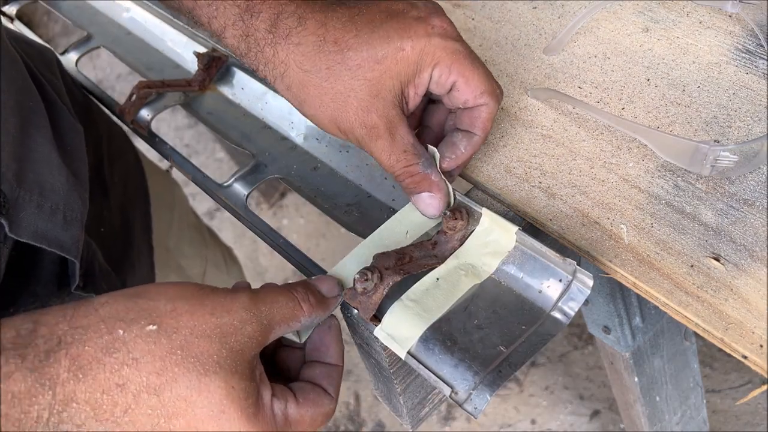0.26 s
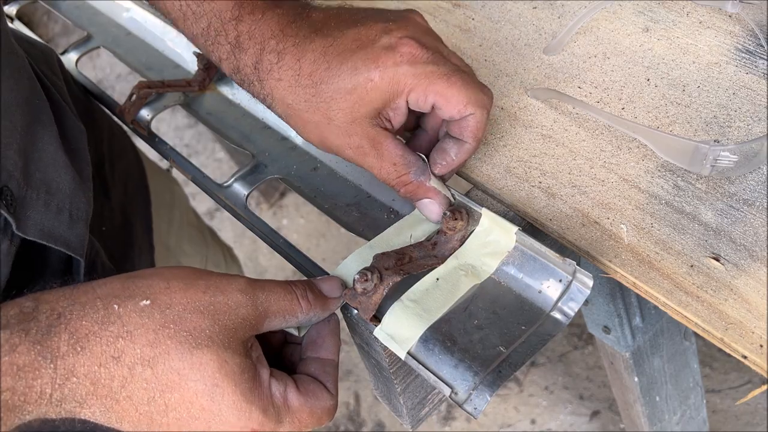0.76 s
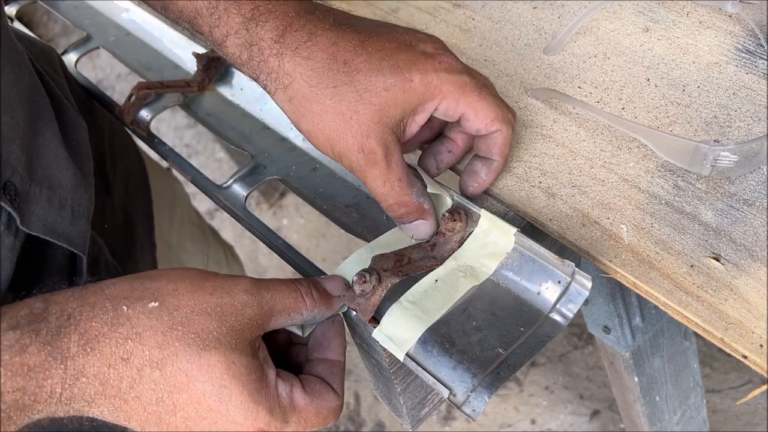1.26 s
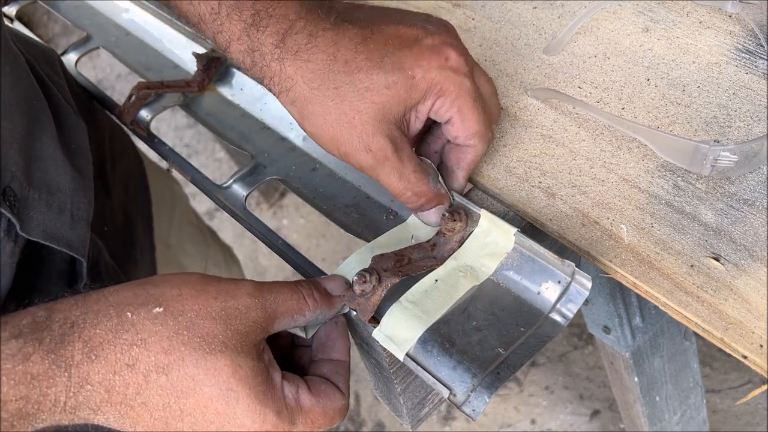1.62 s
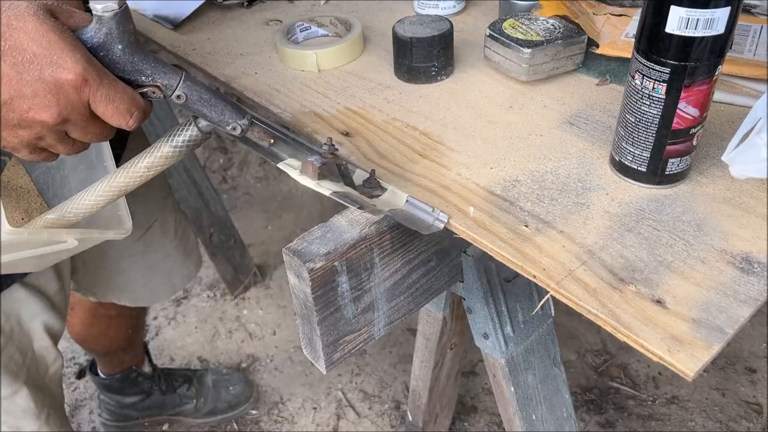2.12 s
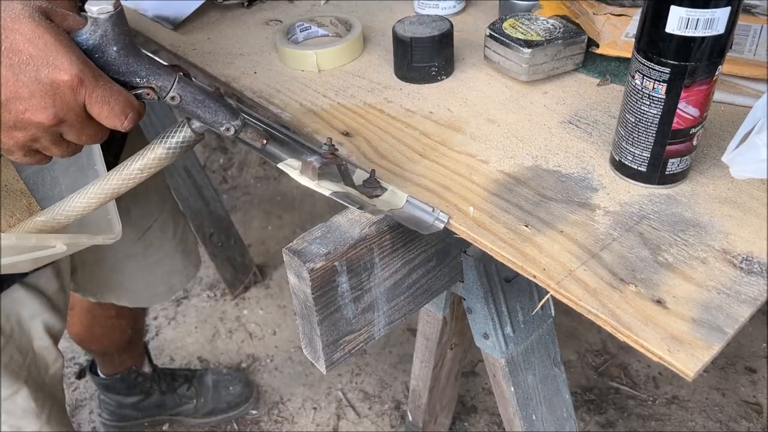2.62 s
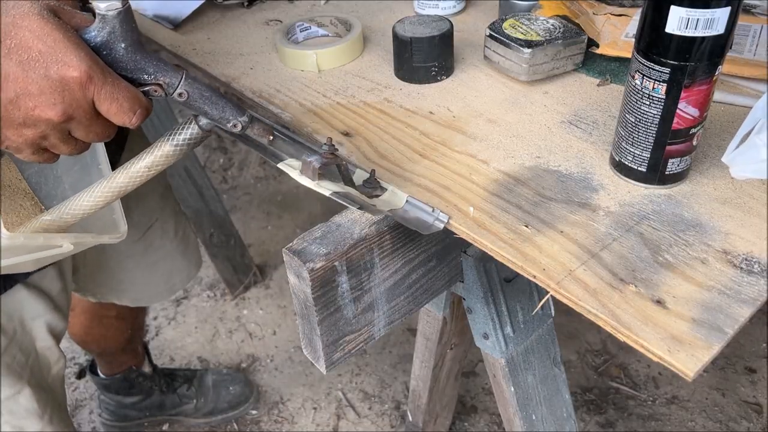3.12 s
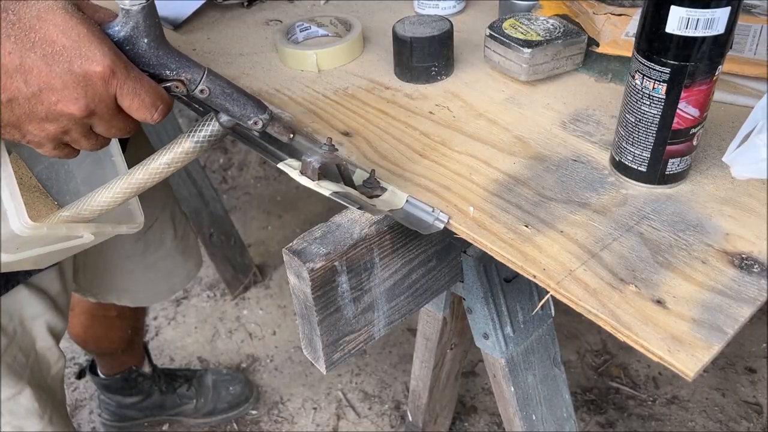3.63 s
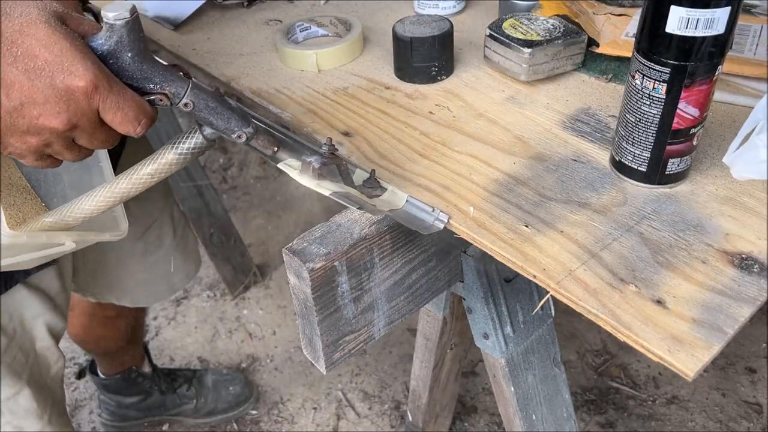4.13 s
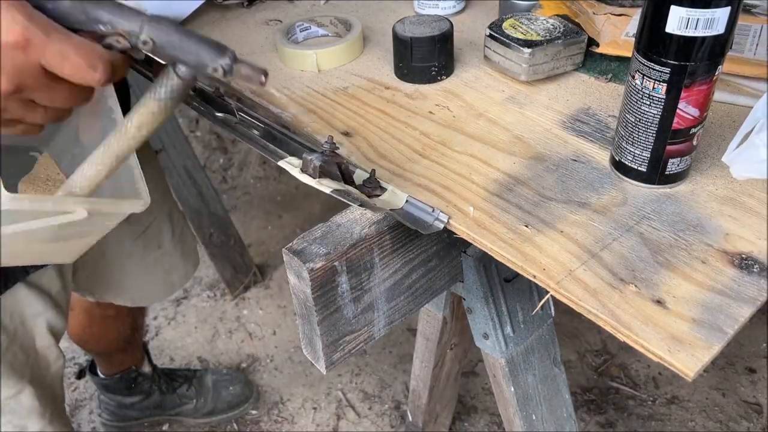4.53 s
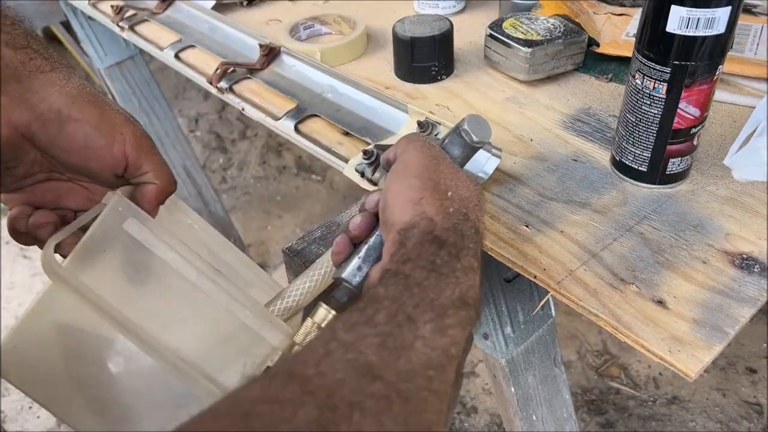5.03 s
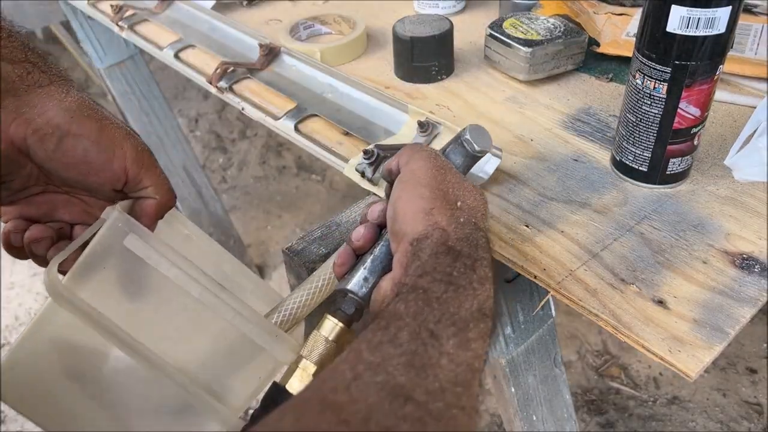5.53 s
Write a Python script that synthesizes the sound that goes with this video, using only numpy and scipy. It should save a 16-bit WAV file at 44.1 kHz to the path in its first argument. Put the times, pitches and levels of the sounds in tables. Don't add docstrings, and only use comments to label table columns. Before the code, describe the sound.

In an open workshop, small sticky tape snaps click over a low steady compressor drone and faint wind rumble. A tiny air puff leads abruptly into a long, loud, bright roar of grit on steel, gradually losing pressure. It shuts off sharply with a short echo, leaving thin hiss and wind; after a scene cut, a closer blast spits, swells and starves. Stereo recorder near the bench.

```python
import sys
import numpy as np
from scipy import signal
from scipy.fft import rfft, irfft, next_fast_len
from scipy.io import wavfile
from scipy.ndimage import uniform_filter1d

SR = 44100
rng = np.random.default_rng(int(sys.argv[2]) if len(sys.argv) > 2 else 0)


def attenuation_scalar(level_db):
    decades = np.asarray(level_db, float) / 20
    return 10 ** decades


def put_to_file(sound):
    columns = np.atleast_2d(sound).T
    safe = np.clip(columns, -1, 1)
    whole_steps = np.round(safe * 32767)
    wavfile.write(sys.argv[1], SR, whole_steps.astype(np.int16))


N = 254016
PAD = next_fast_len(N + 8192)
T = np.arange(N) / SR
HZ = np.maximum(np.arange(PAD // 2 + 1) * SR / PAD, 1)

PUFF_S, LONG_ON_S, LONG_OFF_S = 1.85, 1.9168, 4.556
JOIN_S = 4.954
CLOSE_ON_S, FULL_FLOW_S = 5.135, 5.178
CROSS_HZ, TOP_LAG_S = 7670, 0.0001494
PIVOT_HZ = 4500

# pitch_hz, left_over_right_db, likeness (0-1), right_lead_rad
LONG_PAIR = [(60, -0.5, 0.78, -0.1), (200, 0.2, 0.84, 0.01), (400, 0.1, 0.73, 0.3), (800, 3.1, 0.65, -0.01),
             (1400, 2.0, 0.68, -0.56), (2100, 3.9, 0.51, -0.96), (2800, 2.3, 0.61, -1.79),
             (3500, 6.0, 0.53, -2.17), (4200, 7.5, 0.44, -2.16), (4900, 10.9, 0.15, 1.18),
             (5600, 8.3, 0.3, 1.93), (6300, 8.8, 0.12, 0.98), (7000, 3.7, 0.48, 0.42)]
CLOSE_PAIR = [(60, -0.4, 0.93, -0.09), (200, 1.3, 0.86, -0.17), (400, 2.5, 0.82, -0.12),
              (800, -3.9, 0.73, 0.08), (1400, 1.5, 0.87, 0.08), (2100, 0.6, 0.79, -0.18),
              (2800, 2.3, 0.81, -1.03), (3500, 1.0, 0.81, -0.97), (4200, 0.3, 0.52, -0.97),
              (4900, 5.8, 0.61, -1.09), (5600, 4.5, 0.42, 0.66), (6300, 1.7, 0.28, 0.13),
              (7000, 1.7, 0.58, 0.25)]
AIR_PAIR = [(60, 1.3, .92, .2), (200, 1.7, .95, .6), (330, 2, .92, 1.05), (500, 0, .4, 1.4),
            (800, 1, .3, 2.6), (1400, 0, .45, 2.5), (2100, 1.3, .1, 2.5), (3500, 2.7, .16, 4.4),
            (4900, 9, .15, 5.7), (5600, 9.4, .15, 6.3), (7000, 2.5, .3, 6.4)]


def at_hz(points, hz):
    where, *columns = np.transpose(points)
    return [np.interp(np.log(hz), np.log(where), c) for c in columns]


def in_time(rows, t):
    s, *columns = np.transpose(rows)
    return [np.interp(t, s, c) for c in columns]


def smooth_chance(shape, size):
    field = rng.standard_normal(shape)
    for axis, cells in enumerate(size):
        for twice in range(2):
            field = uniform_filter1d(field, max(int(cells), 1), axis=axis)
    return field / field.std()


def drift(cells):
    count = N // 32 + 2
    return np.interp(np.arange(N) / 32, np.arange(count), smooth_chance((count,), (cells,)))


def bump(t, s, length):
    return np.exp(-((t - s) / length) ** 2)


def settle(t, tau):
    return 1 - np.exp(-np.maximum(t, 0) / tau)


def noise():
    return rng.standard_normal((2, N))


def reshape(x, gain_db):
    hz, t, z = signal.stft(x, SR, nperseg=1024, noverlap=768)
    z = z * attenuation_scalar(gain_db(np.maximum(hz, 1)[:, None], t))
    return signal.istft(z, SR, nperseg=1024, noverlap=768)[1][..., :N]


def ports(two, colour, pair, extra=1, band=(3000, 7000), top_alike=.95):
    balance_db, alike, lead = at_hz(pair, HZ)
    top = np.clip((HZ - CROSS_HZ) / 1200 + .5, 0, 1)
    late_left = np.exp(2j * np.pi * HZ * TOP_LAG_S)
    shared = (1 - top) * alike * np.exp(1j * lead) + top * top_alike * late_left
    own = np.sqrt(np.clip(1 - (1 - top) * alike ** 2 - top * top_alike ** 2, 0, 1))
    left = attenuation_scalar(at_hz(colour, HZ)[0]) * extra
    right = attenuation_scalar(-balance_db * (1 - top))
    mid_power = np.abs(left) ** 2 * (np.abs(1 + right * shared) ** 2 + (right * own) ** 2) / 4
    inside = (HZ > band[0]) & (HZ < band[1])
    left = left / np.sqrt(mid_power[inside].sum() / len(HZ))
    a, b = rfft(two, PAD)
    return irfft([left * a, left * right * (shared * a + own * b)], PAD)[:, :N]


def ducking():
    duck_db, duck_s, third_scene_db = -14, 0.21, 2
    second = duck_db * settle(T - LONG_ON_S, duck_s)
    third = third_scene_db + duck_db * settle(T - FULL_FLOW_S, duck_s)
    return np.where(T < JOIN_S, second, third)


def wind():
    # peak_s, level_db, length_s
    gusts_and_lulls = [(1.11, -9, .05), (1.28, 3, .06), (2.01, 16, 0.1), (2.34, 15, .05), (2.58, 8, .05),
                       (3.344, -17, .04), (3.548, 3, .08), (4.2, -11, .05), (4.553, 17, 0.057),
                       (5.25, 7, .08), (5.41, -8, .05), (5.623, 5.5, 0.13)]
    gusts = sum(db * bump(T, s, length) for s, db, length in gusts_and_lulls)
    level_db = -56.5 + 7 * (T > JOIN_S) + 0.57 * ducking()
    lumps = attenuation_scalar(level_db + gusts + 2.0 * drift(80.))
    colour = [(20, -22), (40, 2.5), (65, 8.5), (110, 2.5), (180, 0), (300, -33)]
    pair = [(60, .5, .9, 0), (300, .5, .9, 0)]
    return ports(noise() * lumps, colour, pair, band=(30, 130))


def shop_air():
    # pitch_hz, level_db
    air_colour = [(60, 2), (130, 9), (270, 12), (330, 11), (430, 4), (560, 7), (830, 13), (1050, 7),
                  (1500, 6), (2500, 0), (4000, -1), (5800, -1), (7000, -10), (10800, -19), (11500, -24),
                  (15500, -31)]
    # pitch_hz, gain_db
    moved_air = [(150, 2), (250, -0.5), (450, 7), (750, -2.5), (1600, 0), (4000, 0), (9000, 0), (13000, 5)]
    lingering = 7.5 * (1 - settle(T - LONG_OFF_S, 0.15)) * (T > LONG_OFF_S) * (T < JOIN_S)
    level_db = -53 + ducking() + lingering

    def breathing(hz, t):
        patches = .6 * smooth_chance((len(hz), len(t)), (12., 20.))
        return patches + at_hz(moved_air, hz)[0] * (t > LONG_ON_S)
    return ports(reshape(noise(), breathing) * attenuation_scalar(level_db - 3.5), air_colour, AIR_PAIR, top_alike=0.91)


def order(k, level_db, lead, waver_db):
    drone_hz = 75.38
    phase = 2 * np.pi * k * drone_hz * T + .12 * np.sqrt(k) * drift(120.) + 7 * rng.random()
    strength = np.sqrt(2) * attenuation_scalar(level_db + waver_db * drift(100.))
    return strength * np.array([np.sin(phase), attenuation_scalar(-2) * np.sin(phase + lead)])


def compressor():
    # order, rms_db, right_lead_rad
    steady = [(1, -59, .2), (4, -45, 1.0), (5, -63, 1.2), (8, -56, .8), (9, -66, 2.5), (10, -59, 1.0),
              (11, -59, 2.9), (12, -62, 1.0), (14, -68, 1.0), (16, -64, 1.0)]
    # order, rms_db, right_lead_rad, beat_period_s, crest_s, depth (0-1)
    beating = [(2, -57, .5, .425, .07, 0.5), (3, -52.5, 0.53, 2.42, .92, 0.7)]
    moved = T > LONG_ON_S
    duck_db = ducking()
    drone = np.zeros((2, N))
    for k, db, lead in steady:
        level_db = db + 0.95 + duck_db - 5.5 * (k > 4) * moved
        drone += order(k, level_db, lead, 1.2 if k == 4 else 2.5)
    for k, db, lead, period, crest, depth in beating:
        beat = 1 + depth * np.cos(2 * np.pi * (T - crest) / period)
        level_db = db + duck_db + 5 * (round(k) == 2) * moved
        drone += beat * order(round(k), level_db, lead, 0.86)
    return drone


def tape():
    # start_s, level_db, length_s, brightness (0-1)
    presses = [(.131, -47, .002, .7), (0.188, -31.5, 0.004, 0.74), (.435, -56, .008, .9),
               (.452, -50, .01, .6), (.493, -45, .002, .8), (.537, -52, .002, .8), (0.622, -45, 0.012, 0.1),
               (.838, -48, 0.0061, 0.2), (.907, -49, .004, .5), (0.953, -50, 0.025, .6),
               (1.056, -35, .007, 0.4), (1.07, -38, .007, 0.5), (1.084, -39, .005, .5),
               (1.158, -50, 0.043, 0.5), (1.19, -52, .045, 0.5), (1.336, -46, .002, .7),
               (1.41, -57, .04, 1), (1.457, -52, .03, 0.8), (1.585, -51, 0.028, .7), (1.702, -48, .002, .9),
               (1.751, -45, .007, .9)]
    faint = attenuation_scalar(-65 + 6.0 * drift(40.)) * (T < PUFF_S)
    dull, bright = 0.17 * faint, faint
    for s, db, length, brightness in presses:
        clump = attenuation_scalar(db) * (T > s) * np.exp(-(np.maximum(T - s, 0) / length) ** 2)
        dull = dull + np.clip(1 - brightness, 0, 1) * clump
        bright = bright + brightness * clump
    sparse = rng.random((2, N)) < .3
    snaps = sparse * noise() * attenuation_scalar(1.5 * rng.exponential(1, (2, N)))
    low = [(1500, -22), (4000, -10), (7000, -3), (9500, 0), (12000, -6), (15500, -14)]
    high = [(3000, -24), (7000, -12), (10500, -5), (13000, 0), (15500, -1)]
    band = (8000, 16000)
    dull_snaps = ports(snaps * dull, low, AIR_PAIR, band=band)
    return attenuation_scalar(-10.0) * (dull_snaps + ports(snaps * bright, high, AIR_PAIR, band=band))


def puff():
    after = T - PUFF_S
    blowing = np.clip(after / .004, 0, 1) * (T < LONG_ON_S) * attenuation_scalar(-43.5 + 2.5 * drift(4.))
    tail = np.maximum(after - 0.02, 0)
    colour = [(300, 1), (1000, -6), (2200, -0.5), (4800, 2.5), (5300, -1.5), (6800, -9), (8800, -4), (15000, -9)]
    dull = [(300, 6), (1500, 3.5), (3000, 4.0), (5000, -3), (8000, -10), (15000, -11)]
    leak = ports(noise() * blowing * attenuation_scalar(-1200 * tail), colour, CLOSE_PAIR)
    return leak + ports(noise() * blowing * attenuation_scalar(-7 - 90 * tail), dull, CLOSE_PAIR)


def bleed():
    leaking = (T > LONG_OFF_S) * (T < JOIN_S) * attenuation_scalar(-64 - 13.95 * (T - LONG_OFF_S))
    colour = [(2500, -22), (3800, -16), (4700, 0), (5600, -6), (6500, -8), (8000, -10), (15000, -19.5)]
    return ports(noise() * leaking, colour, LONG_PAIR)


def spit():
    colour = [(150, -12), (400, 10), (700, -1), (1200, -10), (4000, -17), (15000, -28)]
    cough = noise() * attenuation_scalar(-30) * bump(T, 5.155, 0.0059)
    return ports(cough, colour, CLOSE_PAIR, band=(200, 2500))


def surroundings(echoes, modes):
    comb = 1 + sum(attenuation_scalar(db) * np.exp(-2j * np.pi * HZ * s) for s, db in echoes)
    return comb * attenuation_scalar(sum(db / (1 + (2 * (HZ - hz) / width) ** 2) for hz, width, db in modes))


def jet(level_db, bite, follows, surges, band, gate, colour, pair, space, top_alike, patchy_db, flutter_db):
    def layers(hz, t):
        octaves = np.clip(np.log2(hz / PIVOT_HZ), -2, 2)
        surging = 0
        for s, db, length, lean in surges:
            surging = surging + db * np.maximum(1 + lean * octaves, 0) * bump(t, s, length)
        dulling = -53 * np.maximum(octaves, 0) * np.maximum(t - LONG_OFF_S, 0) * (t < JOIN_S)
        patches = patchy_db * smooth_chance((len(hz), len(t)), (14., 8.))
        return at_hz(follows, hz)[0] * in_time(bite, t)[0] + surging + patches + dulling
    flow = attenuation_scalar(level_db + flutter_db * drift(31.0)) * gate
    return ports(reshape(noise(), layers) * flow, colour, pair, space, band, top_alike)


def long_gate():
    after = np.maximum(T - LONG_OFF_S, 0)
    dying = np.sqrt(attenuation_scalar(-2800 * after) + attenuation_scalar(-23 - 460 * after) + attenuation_scalar(-46 - 200 * after))
    return np.minimum(dying, 1) * np.clip((T - LONG_ON_S) / 0.00098, 0, 1) * (T < JOIN_S)


def long_burst():
    # pitch_hz, level_db
    colour = [(40, -27.5), (100, -14.5), (300, -15), (700, -12.5), (1200, -7), (2000, -3.5), (3000, -3),
              (4600, 0.5), (6000, -2.5), (7300, -5.5), (8500, 0.7), (10300, 0.9), (12000, -3.5),
              (15000, -4.5)]
    # delay_s, level_db
    echoes = [(.0021, -38), (.0037, -24), (.0074, -18)]
    # pitch_hz, width_hz, gain_db
    bracket = [(1530, 110, 3), (2380, 290, 1.5), (3934, 26, 7), (4280, 85, 0), (5197, 55, 6)]
    # time_s, level_db
    bite = [
        (1.92, 5),
        (2.2, 4.5),
        (2.7, 3.5),
        (2.86, 0.5),
        (3.5, -0.5),
        (3.9, -2),
        (4.56, -2.5),
    ]
    # pitch_hz, share
    follows = [(1400, 1.02), (4500, 0.89), (8200, 0.81), (13500, 0.16)]
    # peak_s, level_db, length_s, treble_lean_per_octave
    surges = [(1.967, 0, 0.017, .1), (2.165, 1, 0.044, 0.17), (2.24, 0.5, 0.017, .6), (2.34, 0, 0.019, 1),
              (2.386, -2.5, 0.011, .2), (2.604, 0, 0.014, .6), (2.8, -1.5, 0.016, 0.2),
              (2.952, 3, 0.018, 0.34), (3.043, -1, 0.036, -0.41), (3.24, 3, 0.043, -0.13),
              (3.4, -1, 0.018, -1.1), (3.598, -2, .025, -0.24), (3.653, 2.1, 0.019, 0.16),
              (3.812, -1.5, .03, -0.56), (3.89, 0.1, 0.054, .9), (4.025, 0, .04, .9),
              (4.142, 2, 0.03, -0.084), (4.352, -3.5, 0.017, 0.22), (4.433, 0.5, 0.036, .8),
              (4.5, -1.5, 0.013, .3)]
    return jet(-27, bite, follows, surges, (3000, 7000), long_gate(), colour, LONG_PAIR,
               surroundings(echoes, bracket), 0.9, patchy_db=1.09, flutter_db=0.62)


def close_burst():
    # pitch_hz, level_db
    colour = [(40, -29), (100, -28), (300, -11), (700, -18), (1300, -6.5), (2000, -5.5), (2900, -1),
              (4000, -4.5), (5000, -0.5), (6200, -6.5), (7600, -8), (8800, -5), (11000, -6.5),
              (14300, -5.5)]
    # delay_s, level_db
    echoes = [(.00085, -27), (.0018, -25), (.0052, -21.5)]
    # pitch_hz, width_hz, gain_db
    hollow = [(1370, 480, 3), (1815, 120, -6.5), (2260, 104, 4.5), (2850, 47, 0), (3420, 210, 2.5),
              (4340, 260, -3), (5130, 280, 5), (14150, 240, 5)]
    # time_s, level_db
    bite = [
        (5.19, 0.5),
        (5.26, 1),
        (5.32, 6),
        (5.44, 6.5),
        (5.53, -1),
        (5.62, -3.5),
        (5.76, -5),
    ]
    # pitch_hz, share
    follows = [(1400, 0.2), (2200, 0.61), (3200, 1.172), (5100, 0.47), (8500, 0.52), (12000, 0.0994)]
    # peak_s, level_db, length_s, treble_lean_per_octave
    surges = [
        (5.192, 5.5, 0.013, 0.4),
        (5.225, 2.5, .012, -0.3),
        (5.248, -2.5, 0.0081, 0.5),
        (5.29, 1.5, 0.023, .7),
        (5.345, -3.5, 0.014, 0.3),
        (5.56, -1.5, 0.023, -.2),
        (5.67, 1.5, 0.041, 0.37),
        (5.745, 0, .012, .6),
    ]
    opening = attenuation_scalar(np.minimum(1150 * (T - FULL_FLOW_S), 0)) * (T > CLOSE_ON_S)
    return jet(-22, bite, follows, surges, (6500, 15500), opening, colour, CLOSE_PAIR,
               surroundings(echoes, hollow), 0.96, patchy_db=1.6, flutter_db=1.04)


def wind_filter(hz, t):
    raised = settle(t - 2.476, 0.31) * settle(4.3 - t, 0.15)
    corner_hz = 60 + 552 * raised
    return -12 / (1 + (hz / corner_hz) ** 14)


def scene():
    background = shop_air() + compressor() + tape()
    blasting = puff() + long_burst() + spit() + close_burst()
    return reshape(background + blasting, wind_filter) + bleed() + wind()


def top_cut(x):
    return signal.sosfilt(signal.butter(12, 16820, fs=SR, output="sos"), x)


def record(dry):
    cut = np.cos(np.pi / 2 * np.clip((HZ - 15850) / 300 + .5, 0, 1)) ** 2
    limited = np.tanh(dry / 1.618) * 1.577
    mix = irfft(rfft(limited, PAD) * cut, PAD)[:, :N]
    return top_cut(mix)


dry = scene()
out = record(dry)
put_to_file(out)
```